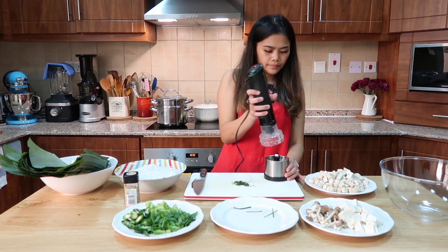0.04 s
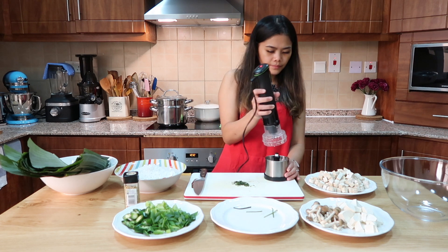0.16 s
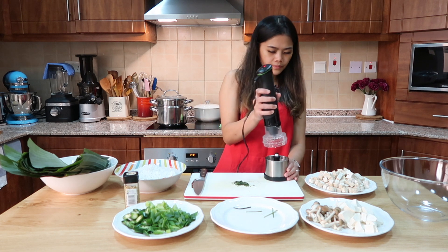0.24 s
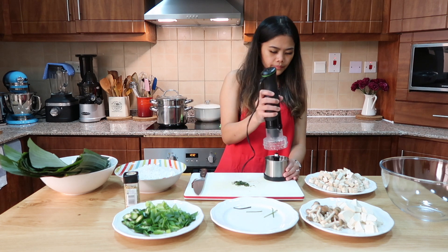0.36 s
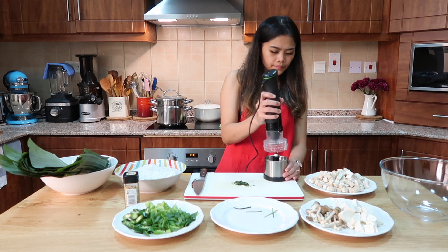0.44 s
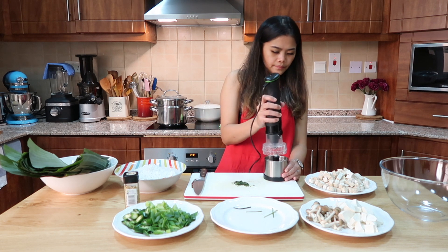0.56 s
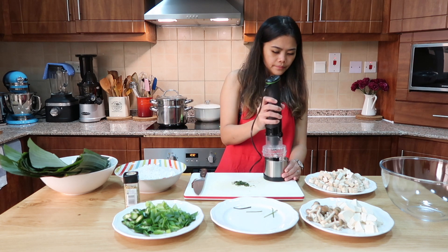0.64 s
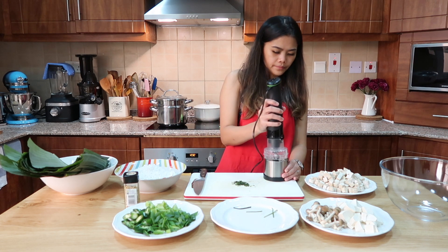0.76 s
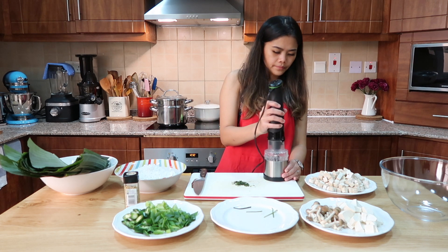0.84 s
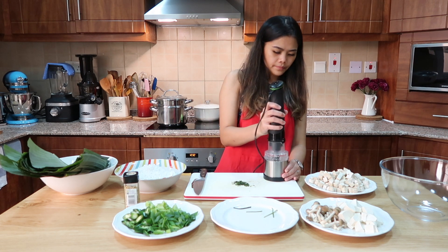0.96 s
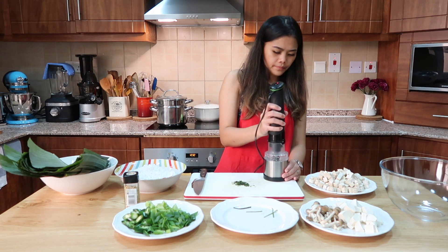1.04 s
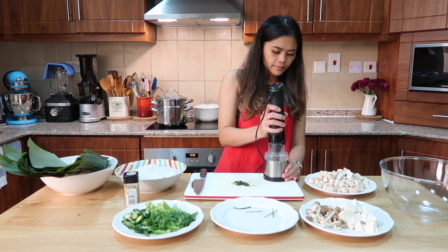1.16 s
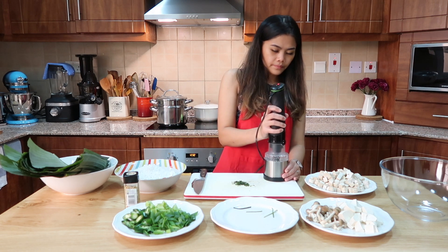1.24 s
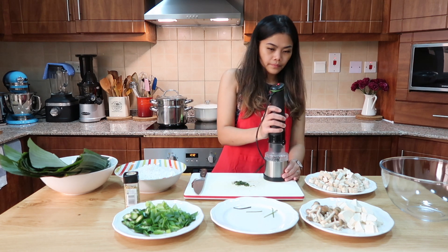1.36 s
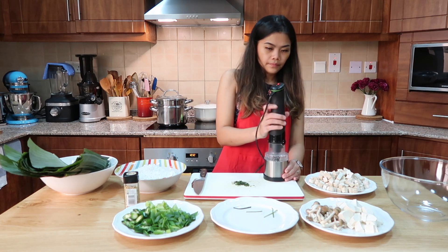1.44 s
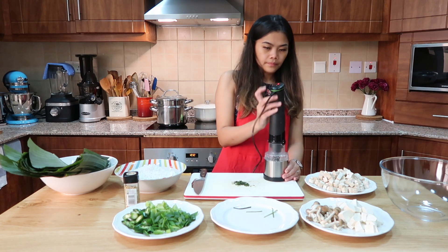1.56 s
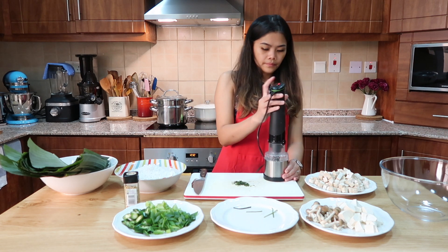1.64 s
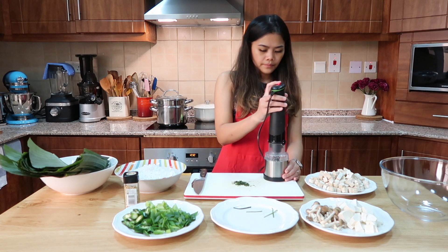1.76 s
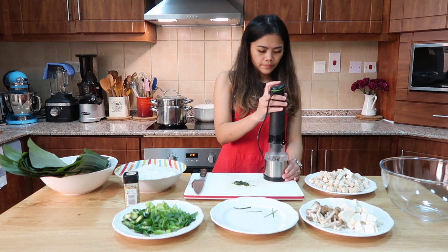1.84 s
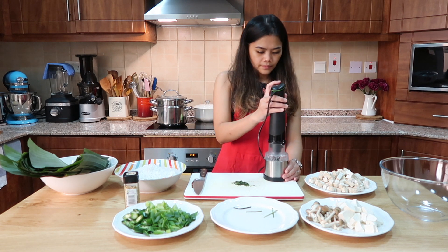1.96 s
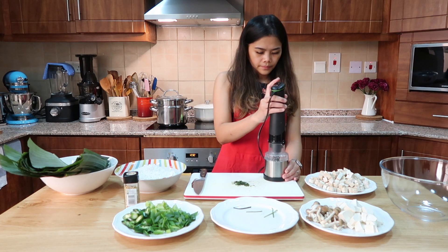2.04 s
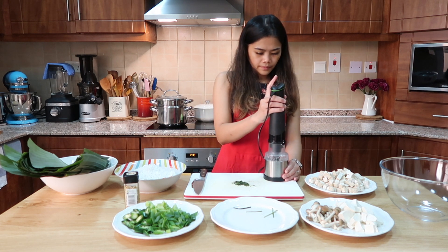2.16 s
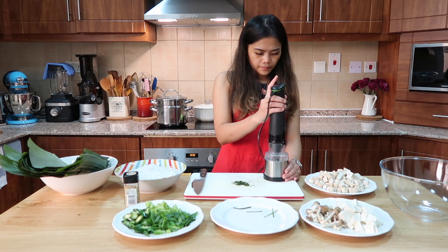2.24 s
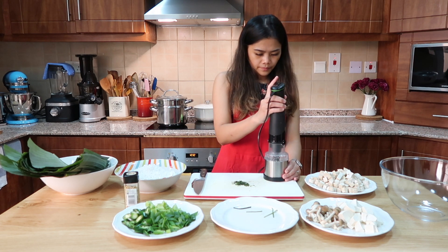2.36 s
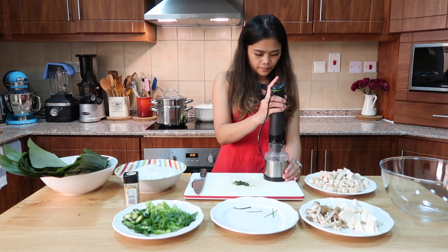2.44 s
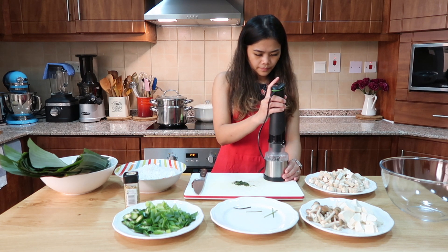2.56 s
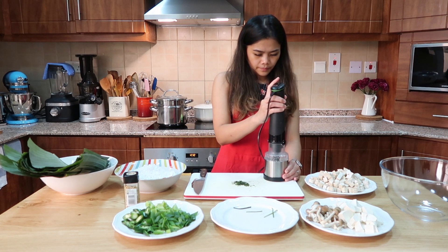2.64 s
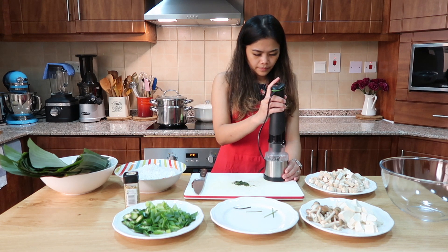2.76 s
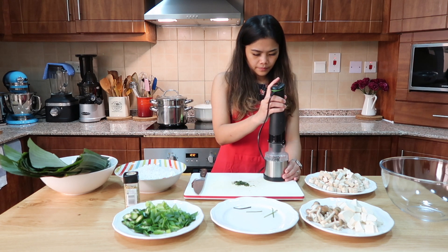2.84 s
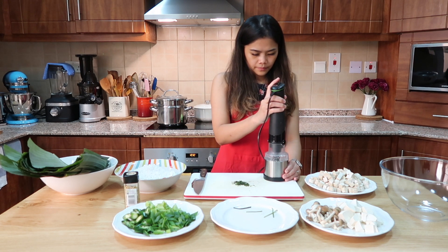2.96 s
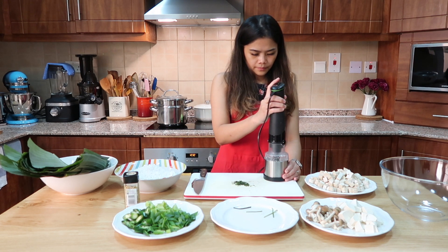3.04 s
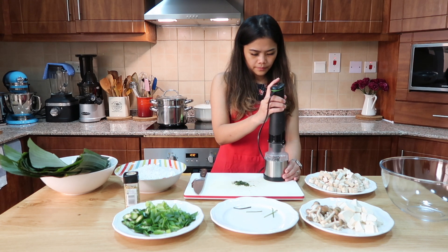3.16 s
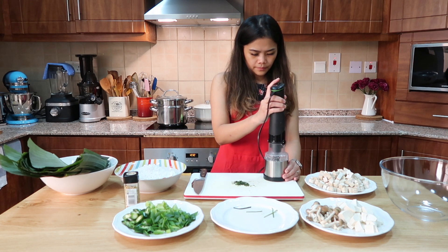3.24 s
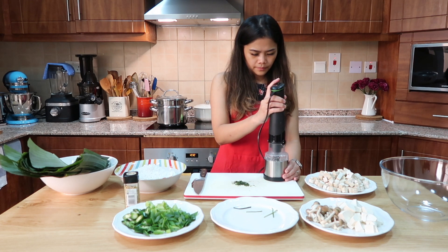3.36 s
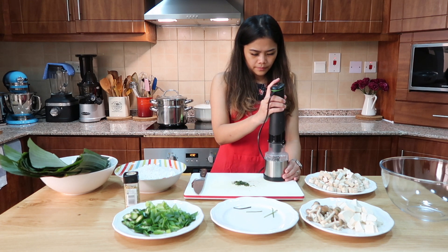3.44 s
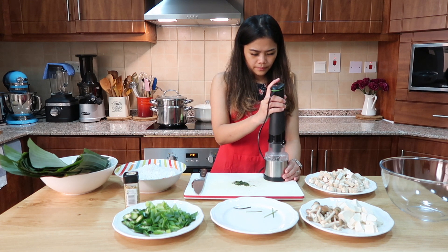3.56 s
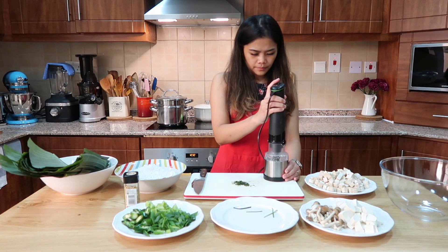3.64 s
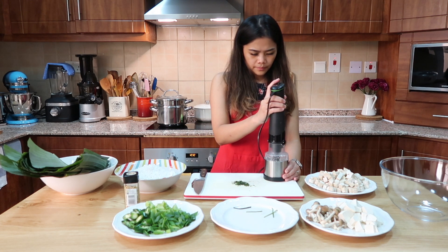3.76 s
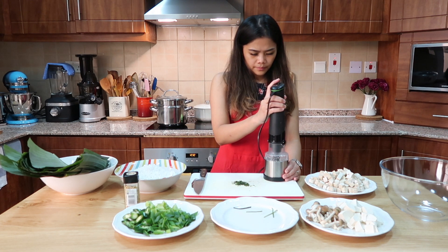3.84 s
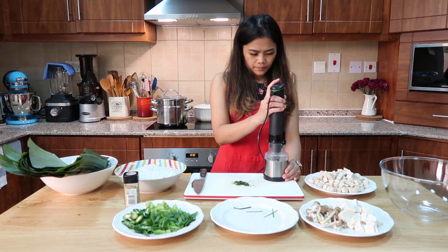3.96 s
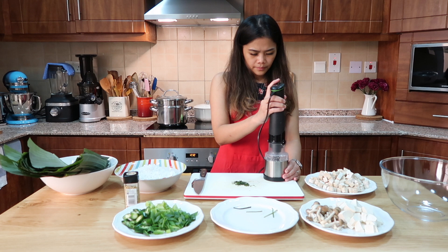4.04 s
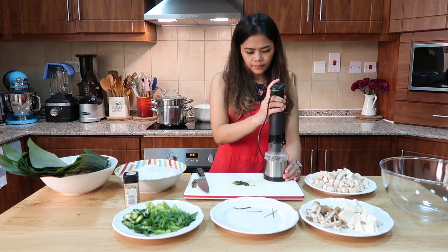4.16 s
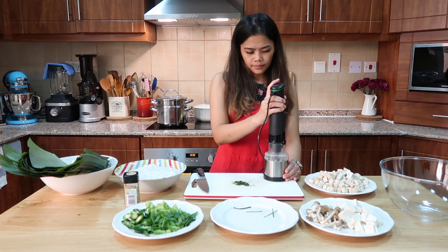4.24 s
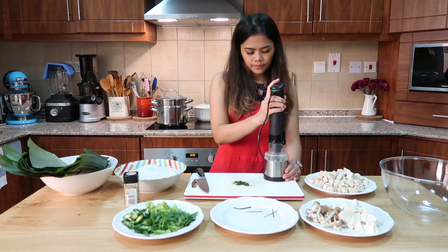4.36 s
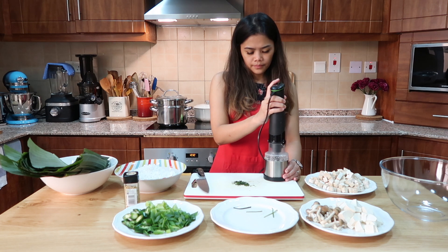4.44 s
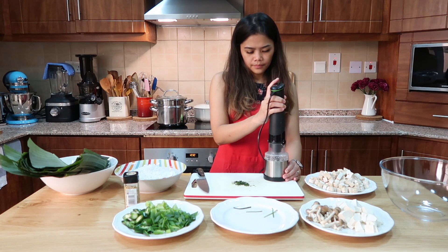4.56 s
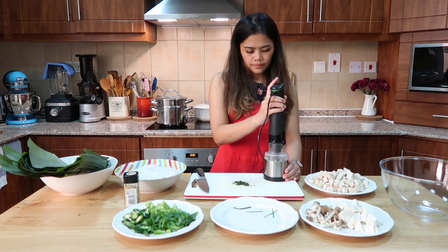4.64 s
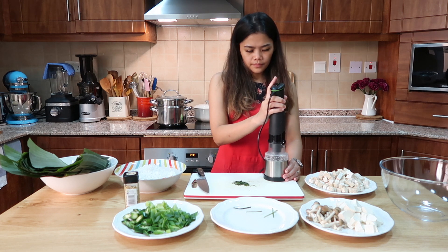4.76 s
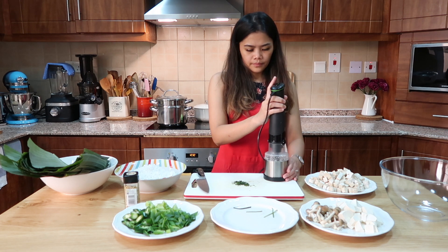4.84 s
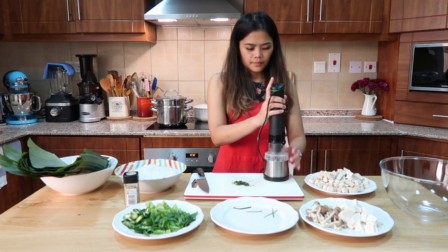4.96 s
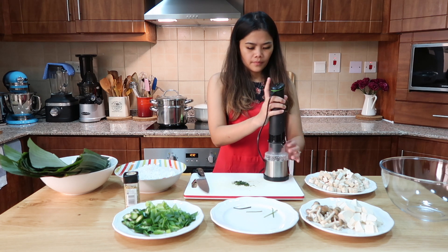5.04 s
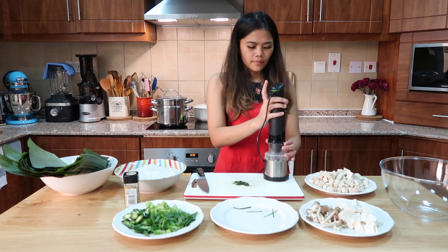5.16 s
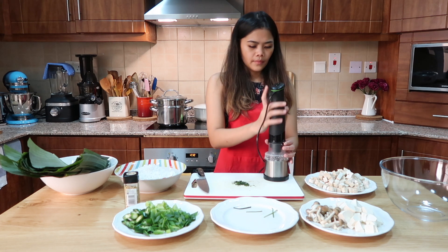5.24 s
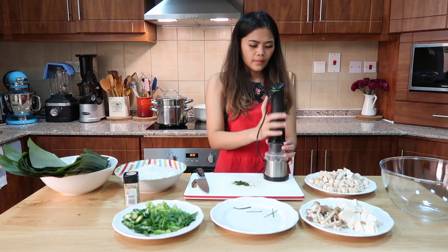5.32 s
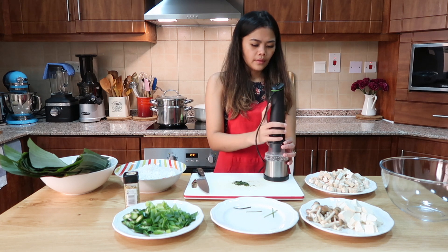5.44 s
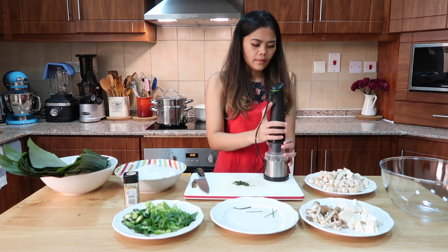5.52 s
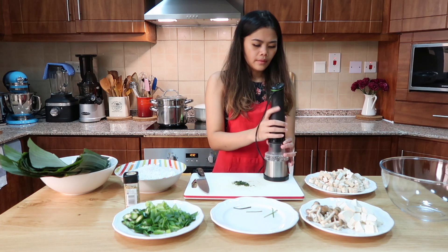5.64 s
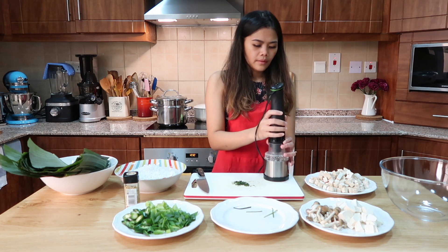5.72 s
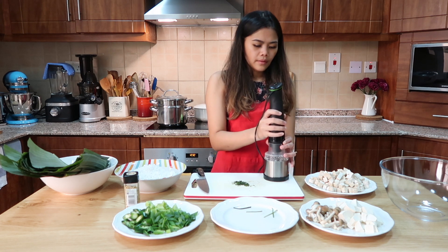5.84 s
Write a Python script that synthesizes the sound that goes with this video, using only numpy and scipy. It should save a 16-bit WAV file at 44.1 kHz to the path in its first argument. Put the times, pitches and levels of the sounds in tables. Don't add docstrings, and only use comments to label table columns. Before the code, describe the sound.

In a humming kitchen, a hand blender clicks onto a small steel cup, grinds hard seeds loudly for under three seconds, then coasts down.

```python
import sys
import numpy as np
from scipy import signal
from scipy.fft import rfft, irfft, next_fast_len
from scipy.io import wavfile
from scipy.ndimage import map_coordinates

SR = 44100
rng = np.random.default_rng(int(sys.argv[2]) if len(sys.argv) > 2 else 0)


def digitize_waveform(pressure):
    field = np.atleast_2d(pressure).T
    bounded = np.clip(field, -1, 1)
    quanta = np.round(bounded * 32767).astype(np.int16)
    wavfile.write(sys.argv[1], SR, quanta)


def makeup_ratio(level_db):
    decades = np.asarray(level_db, float) / 20
    return 10 ** decades


N = 259749
T_S = np.arange(N) / SR
ON_S, OFF_S, SPIN_UP_S, COAST_S = 2.21, 4.73, 0.12, 0.36


def unit(x):
    return x / np.sqrt(np.mean(x ** 2) + 1e-20)


def along(points, hz):
    f, v = np.transpose(points)
    return np.interp(np.log(hz + 1), np.log(f + 1), v)


def curves(rows):
    s, *cols = np.transpose(rows)
    return [np.interp(T_S, s, c) for c in cols]


def ramp(start_s, length_s):
    return np.clip((T_S - start_s) / length_s, 0, 1)


def wobble(rate_hz):
    knots = rng.standard_normal(int(N * 60 / SR) + 4)
    return map_coordinates(knots, [np.arange(N) * min(rate_hz, 60) / SR])


def filtered(x, response):
    m = next_fast_len(N + SR // 2)
    return irfft(rfft(x, m) * response(np.fft.rfftfreq(m, 1 / SR)), m)[..., :N]


def modes(table):
    def response(f):
        total = 0
        for k, (centre, width, db) in enumerate(table):
            peak = 1j * f * width / (centre * centre - f * f + 1j * f * width)
            total = total + (-1) ** k * makeup_ratio(db) * peak
        return total
    return response


def impacts(rate_hz, spread_db):
    chance, size, sign = rng.random(N), rng.exponential(size=N), rng.choice([-1, 1], N)
    return unit((chance < rate_hz / SR) * sign * makeup_ratio(spread_db * np.minimum(size, 3)))


def tone(hz, drift_rad):
    return np.sqrt(2) * np.sin(2 * np.pi * np.cumsum(hz + np.zeros(N)) / SR + drift_rad * wobble(25))


def speed():
    spin_up = 0.28 + 0.72 * ramp(ON_S, SPIN_UP_S)
    return spin_up * np.exp(-np.maximum(T_S - OFF_S, 0) / COAST_S)


# [f/Hz, t60/s]
ECHO_T60 = [(200, 0.86), (1300, 0.67), (4000, 0.71), (12000, 0.22)]
# [f/Hz, level/dB]
SIDE_RESPONSE = [(60, -46), (130, -49), (220, -47), (420, -24.5), (700, -31.5), (1280, -24), (2000, -29),
                 (3000, -17.5), (4400, -3), (6000, 0), (8000, 4), (11000, 16), (15000, 10)]


def kitchen(x, wet_db, side_db):
    hz, t, z = signal.stft(rng.standard_normal((2, 2, SR // 2)), SR, nperseg=256)
    decay = makeup_ratio(-60 * t / along(ECHO_T60, hz)[:, None])
    tails = signal.istft(z * decay, SR, nperseg=256)[1]
    tails = tails / np.linalg.norm(tails[0, 0])
    sway_rad = 0.85 * wobble(3.023)
    parts = x * np.array([np.cos(sway_rad), np.sin(sway_rad)])
    parts = np.pad(parts, ((0, 0), (250, 0)))[:, None]
    mid, side = signal.fftconvolve(parts, tails, axes=2).sum(0)[:, :N]
    side = filtered(side, lambda f: makeup_ratio(side_db + along(SIDE_RESPONSE, f)))
    mid = filtered(mid, lambda f: makeup_ratio(wet_db) / (1 + (400 / (f + 1)) ** 2))
    return np.array([x + mid, side])


# [f/Hz, density/dB per Hz]
AIR_MID = [(15, -55), (32, -12), (48, -28), (75, -11.5), (95, -7.5), (206, -7.5), (251, -13), (355, -17),
           (582, -19), (1080, -21.5), (5040, -40), (10300, -50.5), (15000, -58)]
# [f/Hz, density/dB per Hz]
AIR_SIDEWAYS = [(35, -50), (60, -25), (163, -7.5), (236, -3), (304, -1.5), (507, -4), (735, -8),
                (1690, -10.5), (9650, -24.5), (15400, -36)]
# [f/Hz, level/dB]
HOOD_LINES = [(50, -54), (100, -42.5), (154, -45.5), (200, -44.5), (300, -51.5), (400, -60), (457, -69),
              (572, -58), (2110, -69)]
FAN_FADES_S, FAN_STOPS_S = 0.41, 5.56


def hood():
    running = ramp(ON_S, SPIN_UP_S)
    fan_on = running * (1 - ramp(FAN_STOPS_S - FAN_FADES_S, FAN_FADES_S))
    air_db = -45 + 5 * fan_on
    hum_db = -2.5 - 2.8 * running
    hum = sum(makeup_ratio(db + 1.23 * wobble(10)) * tone(hz, drift_rad=0.14) for hz, db in HOOD_LINES)
    mid = unit(filtered(rng.standard_normal(N), lambda f: makeup_ratio(along(AIR_MID, f))))
    side = unit(filtered(rng.standard_normal(N), lambda f: makeup_ratio(along(AIR_SIDEWAYS, f))))
    return np.array([makeup_ratio(air_db) * mid + makeup_ratio(hum_db) * hum, makeup_ratio(-55.5) * side])


# [t/s, length/s, level/dB rms, ring f/Hz, top f/Hz]
RIM_SCRAPES = [
    (0.878, .1, -46, 860, 2200),
    (.878, 0.064, -56, 2700, 3600),
    (1.072, .06, -41.5, 1140, 2290),
    (1.77, 0.067, -45, 1060, 2200),
    (1.813, 0.096, -44.5, 3300, 5400),
    (1.812, 0.094, -46, 4700, 5800),
    (2.07, .1, -49, 3070, 3600),
]
RING_Q, RING_DB = 9, 13


def scrapes():
    out = np.zeros(N)
    for s, length_s, db, ring_hz, top_hz in RIM_SCRAPES:
        band = signal.butter(3, [0.2 * top_hz, top_hz], "band", fs=SR)
        stroke = ramp(s, 0.08 * length_s) * (1 - ramp(s + 0.081 * length_s, 0.66 * length_s))
        grit = impacts(400, spread_db=6.0)
        ring = signal.lfilter(*signal.iirpeak(ring_hz, RING_Q, fs=SR), grit)
        out = out + makeup_ratio(db) * stroke * unit(signal.lfilter(*band, grit) + makeup_ratio(RING_DB) * ring)
    return out


# [t/s, peak level/dB, snap f/Hz, knock level/dB, tick f/Hz]
CATCHES = [(.879, -35.5, 860, -11, 3200), (.9, -41, 910, 0, 2180), (0.924, -45, 3620, 5, 9000),
           (0.951, -55, 900, 1, 9000), (0.986, -38, 1000, -15, 2190), (1.078, -37, 1080, 6, 3200),
           (1.087, -46, 1110, 15, 7000), (1.105, -38, 1140, 0, 1500), (1.303, -44, 1200, 5, 1800),
           (1.722, -41, 1500, -19, 3570), (1.776, -35, 1000, -12.5, 1600), (1.807, -17.5, 3240, -36, 5700),
           (1.814, -40, 4930, -30, 6470), (2.061, -22.5, 3100, -13, 3600), (2.063, -34, 1020, -6, 1470),
           (2.145, -46, 4470, -4, 5500), (2.213, -31, 1990, -20, 4200), (5.608, -59, 1580, -3, 1982),
           (5.676, -58, 1100, 10, 2000)]
TICK_DB, TICK_LAGS = -13.5, 0.21
JIGGLE_DB, JIGGLE_T60_S = -8, 0.25
SNAP_DIRECT, SNAP_TO_ROOM = 0.75, 0.25


def fitting():
    beam, spread, t = np.zeros(N + SR), np.zeros(N + SR), np.arange(SR // 4) / SR
    for s, db, hz, knock_db, tick_hz in CATCHES:
        snap = np.sin(2 * np.pi * hz * t) * np.exp(-((t - 0.0014) / 0.0007) ** 2)
        band = signal.butter(3, [0.33 * tick_hz, min(tick_hz, SR / 2.2)], "band", fs=SR)
        steps = np.repeat(rng.standard_normal(len(t)), 130)[:len(t)]
        grains = rng.standard_normal(len(t)) * makeup_ratio(3.1 * steps)
        decay = makeup_ratio(-60 * t / 0.041) + makeup_ratio(JIGGLE_DB - 60 * t / JIGGLE_T60_S)
        tick = signal.lfilter(*band, decay * grains)
        tick = makeup_ratio(TICK_DB - TICK_LAGS * db) * tick / np.abs(tick).max()
        knock = makeup_ratio(knock_db - 60 * t / 0.1) * np.sin(2 * np.pi * 270 * t)
        start = round(s * SR) - 30
        beam[start:][:len(t)] += makeup_ratio(db) * snap
        spread[start:][:len(t)] += makeup_ratio(db) * (tick + knock)
    heard = kitchen(spread[:N] + scrapes() + SNAP_TO_ROOM * beam[:N], wet_db=-0.5, side_db=0.5)
    return heard + [SNAP_DIRECT * beam[:N], np.zeros(N)]


# [t/s, peak level/dB, f/Hz]
CUP_ROCKS = [(2.398, -22, 199), (2.663, -16, 298), (2.78, -40, 210), (2.961, -16, 262), (3.068, -12.5, 240),
             (3.118, -14.5, 269), (3.649, -20, 212), (3.941, -21, 209), (4.106, -8.5, 244),
             (4.379, -10, 248), (4.418, -28, 243), (4.599, -18.5, 226), (4.779, -12.5, 160),
             (4.899, -18.5, 238), (4.999, -21, 98), (5.19, -33, 50), (5.66, -32, 60)]


def thumps():
    out, t = np.zeros(N + SR), np.arange(SR // 8) / SR
    for s, db, hz in CUP_ROCKS:
        envelope = makeup_ratio(db + 2.0 - 60 * t / 0.074) * (1 - np.exp(-t / 0.0058))
        out[round(s * SR):][:len(t)] += envelope * np.sin(2 * np.pi * hz * t)
    return out[:N]


# [f/Hz, level/dB]
SPARKS = [(9000, -40), (11000, -17), (13500, 6), (15300, -6), (16000, -40)]
BRUSH_DB, BRUSH_EASES_DB_PER_S = -56, 4


def brushes():
    powered = ramp(ON_S, SPIN_UP_S) * (1 - ramp(OFF_S - SPIN_UP_S, SPIN_UP_S))
    level_db = BRUSH_DB - BRUSH_EASES_DB_PER_S * (T_S - ON_S) + 2.0 * wobble(15)
    hiss = unit(filtered(impacts(6000, spread_db=5.0), lambda f: makeup_ratio(along(SPARKS, f))))
    return powered * makeup_ratio(level_db) * hiss


# [t/s, level/dB]
LOAD_UNBALANCE = [(2.33, -6), (2.7, -6), (3.1, 2.5), (3.4, -0.5), (3.7, -1.5), (4.1, 3.5), (4.4, 0.5),
                  (4.72, 0.5)]
FULL_HZ = 210.3
TURN_DB, TURN_GROWS, TURN_SLOWS_DB = -38.5, 1.16, 31
BLADE_DB, BLADE_GROWS, BLADE_SLOWS_DB = -34, 1, 104
BOARD_HZ, BOARD_WIDTH_HZ, BOARD_LIFT_DB = 160, 30, 10.5
BUZZ_DB, BUZZ_EASES_DB_PER_S, BUZZ_OFF_DB_PER_S = -37, 7, 78
COIL_FOURTH_DB, COIL_FOURTH_GROWS_DB_PER_S = -39, 1


def motor():
    share, (uneven_db,) = speed(), curves(LOAD_UNBALANCE)
    turns_hz = FULL_HZ * share
    lift_db = BOARD_LIFT_DB * np.exp(-((turns_hz - BOARD_HZ) / BOARD_WIDTH_HZ) ** 2)
    turn_db = TURN_DB + TURN_GROWS * uneven_db + TURN_SLOWS_DB * np.log10(share) + lift_db
    blade_db = BLADE_DB + BLADE_GROWS * uneven_db + BLADE_SLOWS_DB * np.log10(share)
    load = makeup_ratio(2.2 * wobble(9))
    turn = makeup_ratio(turn_db) * tone(turns_hz, drift_rad=0.74)
    blades = tone(2 * turns_hz, drift_rad=1.1) + makeup_ratio(-7) * tone(2 * turns_hz + 100, drift_rad=1.1)
    shaft = (T_S > ON_S) * load * (turn + makeup_ratio(blade_db) * blades)

    started = ramp(ON_S, SPIN_UP_S)
    buzz_db = BUZZ_DB - BUZZ_EASES_DB_PER_S * (T_S - ON_S) - BUZZ_OFF_DB_PER_S * np.maximum(T_S - OFF_S, 0)
    buzz = started * makeup_ratio(buzz_db + 2.5 * wobble(8)) * tone(100, drift_rad=0.45)
    fourth_db = COIL_FOURTH_DB + COIL_FOURTH_GROWS_DB_PER_S * (T_S - ON_S) + 1.95 * wobble(8)
    powered = started * (1 - ramp(OFF_S, SPIN_UP_S))
    return shaft + buzz + powered * makeup_ratio(fourth_db) * tone(400, drift_rad=0.6)


# [t/s, peak level/dB]
BIG_SEEDS = [(2.315, -8), (2.346, -9), (2.623, -0.5), (2.699, -2), (2.771, -30), (2.794, -1), (2.891, -4),
             (2.971, -1.5), (3.076, -3), (3.345, -12), (3.612, -2.5), (3.639, -10), (3.722, -13),
             (3.866, -17), (3.958, 6.5), (4.107, -18), (4.245, -7), (4.34, -3), (4.419, -26), (4.442, 1),
             (4.541, -17), (4.602, 1.5)]


def lumps():
    out, crumble = np.zeros(N), np.hanning(1100) ** 2
    for s, db in BIG_SEEDS:
        grains = rng.standard_normal(len(crumble))
        out[round(s * SR) - 500:][:len(crumble)] += makeup_ratio(db + 5) * crumble * grains
    return signal.lfilter([0.3], [1, -0.75], out)


# [t/s, level/dB]
GRIND_LEVEL = [
    (2.213, -37.5),
    (2.26, -33.5),
    (2.33, -15),
    (2.44, -18),
    (4.74, -19),
    (4.9, -23),
    (5.03, -27.5),
    (5.25, -48),
    (5.45, -76.5),
]
# [t/s, swell/dB]
HEAP_SLIDES = [
    (2.58, 1.5),
    (2.78, 2.5),
    (3.2, 4),
    (3.36, -2),
    (3.48, 0.5),
    (3.57, -2.5),
    (3.64, 2),
    (4.05, -0.5),
]
# [f/Hz, width/Hz, level/dB]
CUP_MODES = [(409, 61, -3.5), (529.7, 17.6, 3.5), (793, 135, -6.5), (1078, 79, 4.5), (1178, 54, 4.5),
             (1270, 95, 6), (1543, 190, -5), (2500, 41, -23)]
WALL_MODES = [(2442, 260, 5.5), (2770, 500, -0.5), (3270, 310, -1.5)]
UPPER_WALL_MODES = [(2615, 250, -1), (2854, 260, 1)]
LID_MODES = [(758, 32, 0)]
BOARD_MODES = [(160, 58, -3.5), (240, 49, 2.5), (343, 250, -8)]
SPRAY_MODES = [(4290, 370, 2.5), (4973, 610, 3.5), (5194, 385, 4.5), (6850, 1130, -10.5), (8130, 870, -14)]
# [f/Hz, level/dB]
RATTLE_FLOOR = [(60, -50), (150, -18.5), (300, -5), (600, -5.5), (900, -13.5), (1800, -5), (3500, -10.5),
                (6000, -21), (9000, -27), (12000, -39.5), (16000, -57)]
# [f/Hz, level/dB]
DUST_FLOOR = [(3000, -32), (6000, -21), (9000, -25), (11000, -27.5), (13500, -53), (16000, -43)]
SLIDE_S = 0.031
EARLIER_DB, EARLIER_T60_S = -58, 1.9
EARLIER_WALL_DB, EARLIER_SPRAY_DB = 5, -1
WALL_DB, WALL_COAST_DB, FLUTTER_DB = -10.5, 4, 1.9
UPPER_WALL_DB, UPPER_COAST_DB, UPPER_FLUTTER_DB = -20.5, 1.5, 2.2
UPPER_FREED_DB, UPPER_FREED_AT_S, UPPER_FREED_S = 13, 3.86, 0.37
LID_DB, LID_COAST_DB, LID_COAST_S, LID_SLACK_S = -10.5, 12, 0.12, 0.091
SPRAY_DB, SPRAY_SLOWS_DB, SPRAY_COAST_DB = -10.5, 45, 2


def grinding():
    coast = ramp(OFF_S, COAST_S)
    wall_db = WALL_DB + WALL_COAST_DB * coast ** 2
    freed = ramp(UPPER_FREED_AT_S, UPPER_FREED_S)
    upper_db = UPPER_WALL_DB + UPPER_FREED_DB * freed + UPPER_COAST_DB * coast ** 2
    lid_db = LID_DB + LID_COAST_DB * ramp(OFF_S + LID_SLACK_S, LID_COAST_S)
    powered = (T_S > ON_S) * (T_S < OFF_S)
    spray_db = SPRAY_DB + SPRAY_COAST_DB * coast + SPRAY_SLOWS_DB * np.log10(speed()) * powered
    slides_db = sum(db * np.exp(-((T_S - s) / SLIDE_S) ** 2) for s, db in HEAP_SLIDES)
    running = np.arange(N) > GRIND_LEVEL[0][0] * SR
    earlier = makeup_ratio(EARLIER_DB - 60 * T_S / EARLIER_T60_S)
    level = running * makeup_ratio(curves(GRIND_LEVEL)[0] + slides_db - 1.0) + earlier

    surge = makeup_ratio(0.65 * wobble(14) + 2.54 * wobble(35))
    blows = surge * impacts(3500, spread_db=3.5) + lumps()
    rattle = unit(filtered(blows, lambda f: modes(CUP_MODES)(f) + makeup_ratio(along(RATTLE_FLOOR, f))))
    wall = unit(filtered(impacts(2500, spread_db=1.0), modes(WALL_MODES)))
    wall = makeup_ratio(wall_db + FLUTTER_DB * wobble(12)) * wall
    upper = unit(filtered(impacts(2500, spread_db=5.0), modes(UPPER_WALL_MODES)))
    upper = makeup_ratio(upper_db + UPPER_FLUTTER_DB * wobble(10)) * upper
    lid = unit(filtered(impacts(600, spread_db=10.5), modes(LID_MODES)))
    lid = makeup_ratio(lid_db + 0.68 * wobble(16)) * lid
    board = unit(filtered(impacts(670, spread_db=11.0), lambda f: modes(BOARD_MODES)(f) ** 2))
    board = makeup_ratio(-19.5 + 1.4 * wobble(12)) * board
    dust = surge * impacts(8000, spread_db=-0.5)
    spray = unit(filtered(dust, lambda f: modes(SPRAY_MODES)(f) + makeup_ratio(along(DUST_FLOOR, f))))
    spray = makeup_ratio(spray_db) * spray
    ring_on = earlier * (makeup_ratio(EARLIER_WALL_DB) * wall + makeup_ratio(EARLIER_SPRAY_DB) * spray)
    return level * (rattle + wall + upper + lid + board + spray) + ring_on


def scene():
    blender = grinding() + motor() + brushes() + thumps()
    mid, side = kitchen(blender, wet_db=-5, side_db=-1.5) + fitting() + hood()
    return np.array([mid + side, mid - side])


def low_pass(x):
    return signal.sosfilt(signal.butter(12, 15500, fs=SR, output="sos"), x)


def record(dry):
    top, top_hz = 0.92, 15350
    rounded = dry / (1 + np.abs(dry / top) ** 6) ** (1 / 6)
    mix = filtered(rounded, lambda f: f < top_hz)
    return low_pass(mix)


dry = scene()
out = record(dry)
digitize_waveform(out)
```